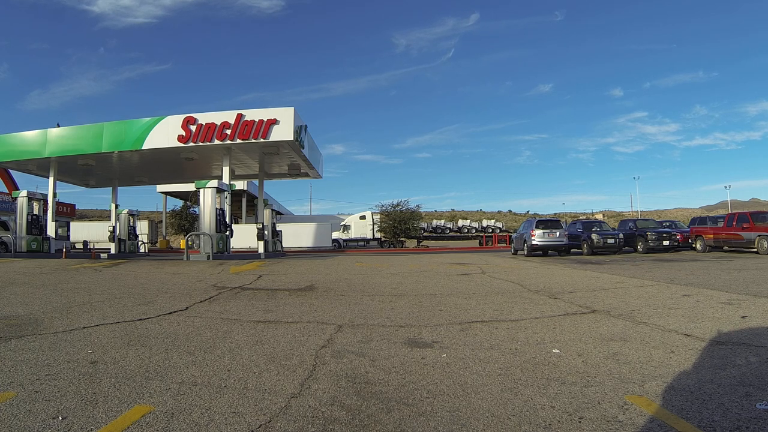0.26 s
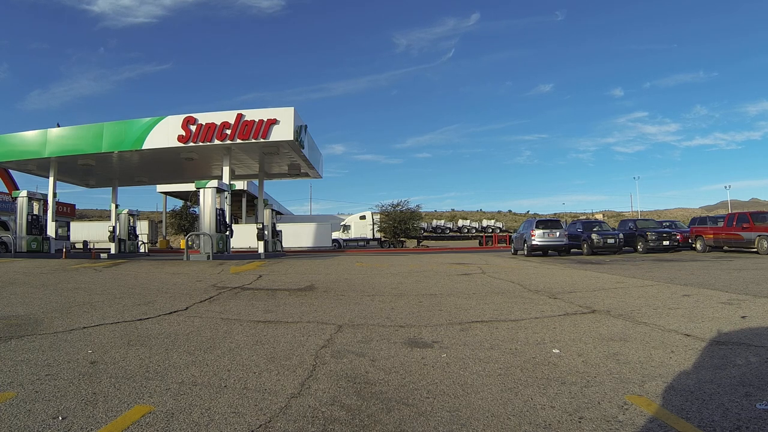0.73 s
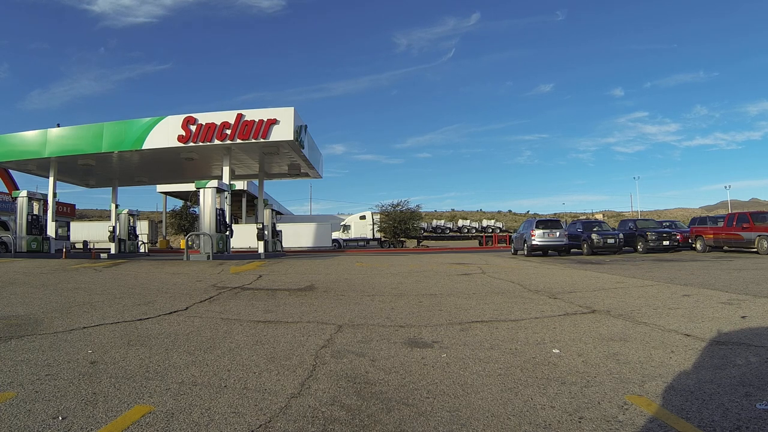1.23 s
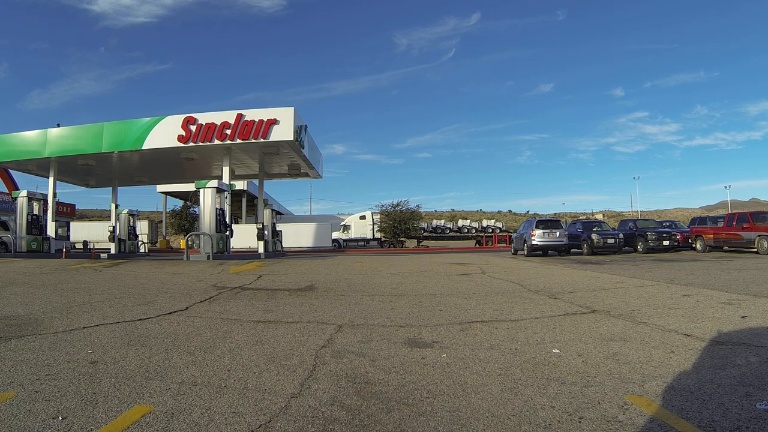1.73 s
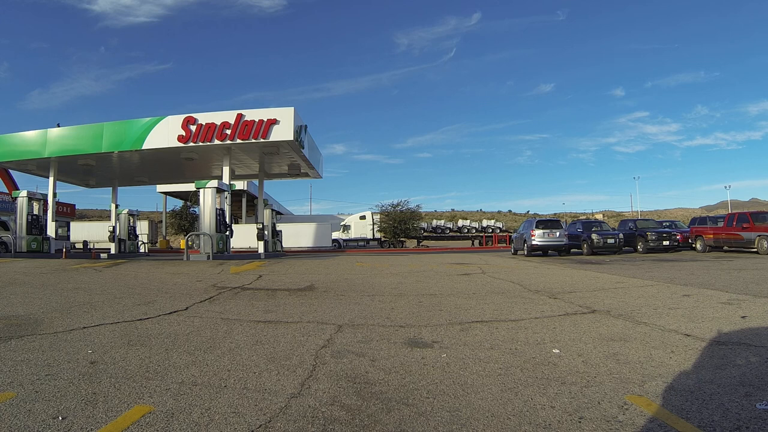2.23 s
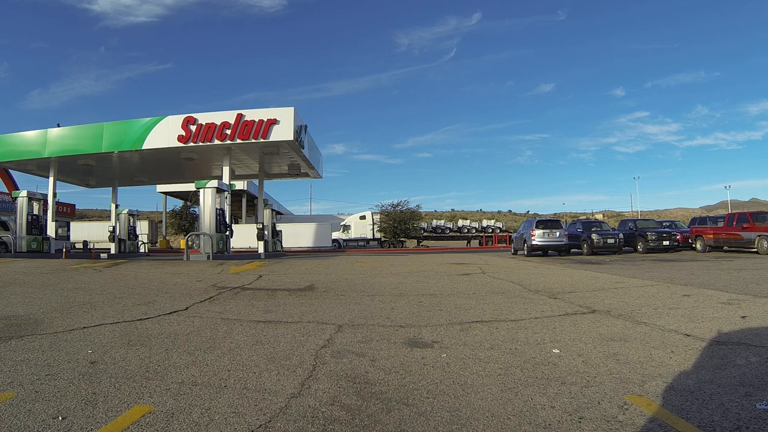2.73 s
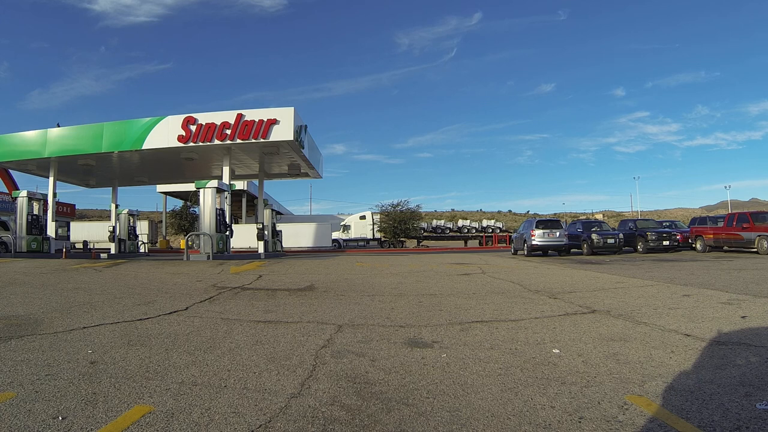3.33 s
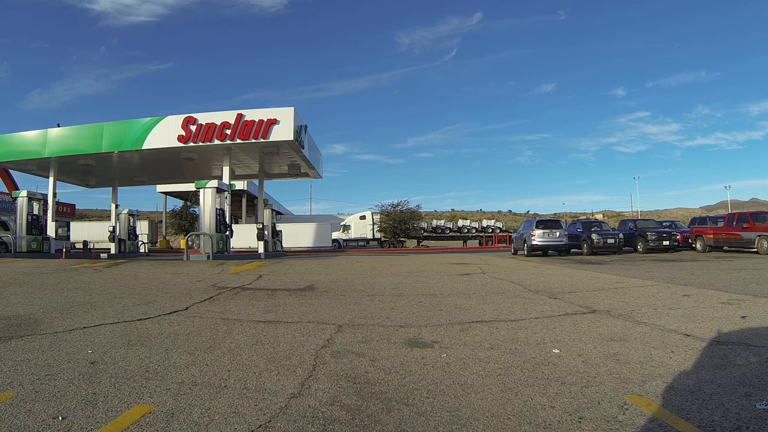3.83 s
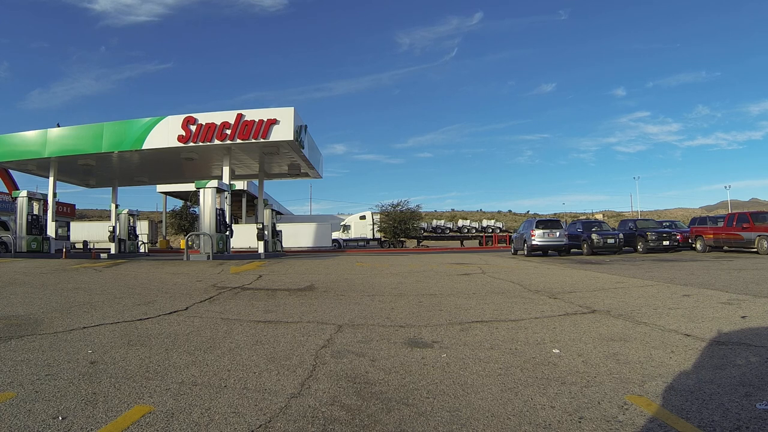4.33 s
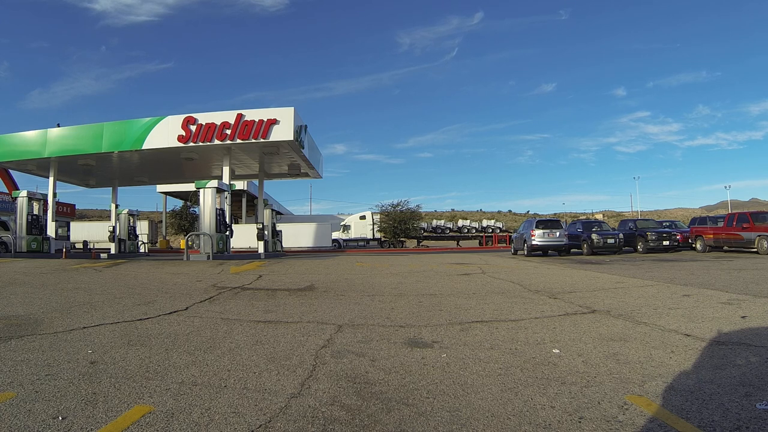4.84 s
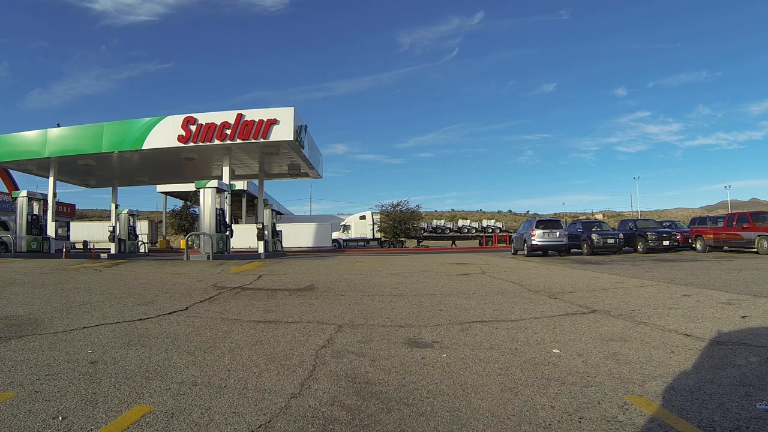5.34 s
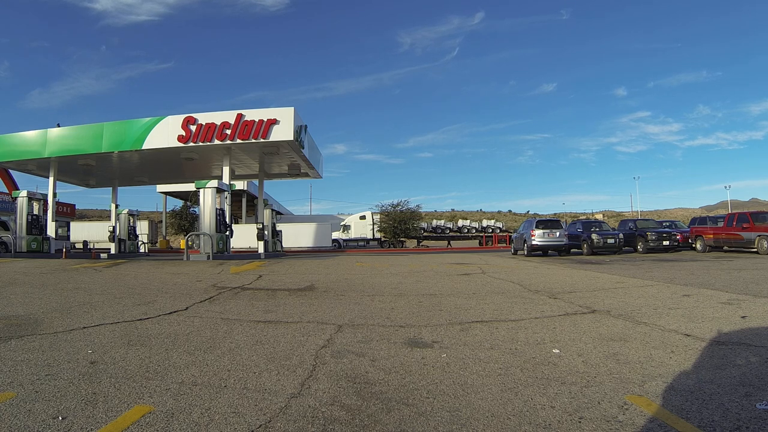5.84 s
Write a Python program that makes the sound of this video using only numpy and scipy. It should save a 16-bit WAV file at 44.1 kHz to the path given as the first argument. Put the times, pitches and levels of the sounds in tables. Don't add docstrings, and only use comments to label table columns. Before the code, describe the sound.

Parked diesels rumble far across an open lot, wavering and beating over blurred traffic. A starter pinion knocks, scrapes and squeals briefly, then the engine fires unevenly, runs up and clatters steadily with gear hum and airy fan noise. It pulls away at a distance. Near the end a brake valve thumps open, releasing compressed air in a sharp rush, then a long, whistling, fading hiss. Small camera microphone, outdoors.

```python
import sys
import numpy as np
from scipy import signal
from scipy.fft import rfft, irfft, next_fast_len
from scipy.io import wavfile
from scipy.ndimage import uniform_filter1d, map_coordinates

SR = 44100
rng = np.random.default_rng(int(sys.argv[2]) if len(sys.argv) > 2 else 0)


def wav_record(signal):
    frames = np.transpose(np.atleast_2d(signal))
    bounded = np.clip(frames, -1, 1)
    quanta = np.round(bounded * 32767).astype(np.int16)
    wavfile.write(sys.argv[1], SR, quanta)


def gain_from_db(level_db):
    decades = np.asarray(level_db, float) / 20
    return 10 ** decades


N = 267880
T = np.arange(N) / SR
CRANK = slice(SR, 2 * SR)


def noise(n=N):
    return rng.standard_normal(n)


def evened(x):
    return x / np.sqrt(np.mean(x ** 2) + 1e-20)


def curves(rows):
    s, *columns = np.transpose(rows)
    gate = np.clip(np.minimum(T - s[0], s[-1] - T) / .02, 0, 1)
    return gate, *(np.interp(T, s, c) for c in columns)


def coloured(x, points):
    size = next_fast_len(N)
    f, db = np.transpose(points)
    hz = np.fft.rfftfreq(size, 1 / SR)
    gain = gain_from_db(np.interp(np.log(hz + 1), np.log(f + 1), db, -120, -120))
    return evened(irfft(rfft(x, size) * gain, size)[:N])


def band(x, lo_hz, hi_hz):
    return signal.sosfilt(signal.butter(4, [lo_hz, hi_hz], "band", fs=SR, output="sos"), x)


def drift(top_hz):
    f, phase = top_hz * np.geomspace(.08, 1, 16), rng.random(16)
    t = T[::64]
    waves = np.sin(2 * np.pi * (f * t[:, None] + phase)) / np.sqrt(f)
    return np.interp(T, t, evened(waves.sum(1)))


def resonate(x, hz, width):
    turn = np.exp(2j * np.pi * np.cumsum(hz * np.ones(len(x))) / SR)
    r = np.exp(-np.pi * width / SR)
    return 2 * (turn * signal.lfilter([1 - r], [1, -r], x / turn)).real


def peak(x, hz, width):
    return signal.lfilter(*signal.iirpeak(hz, hz / width, SR), x)


def tone(hz, db):
    turns = np.cumsum(hz * np.ones(N)) / SR + rng.random()
    return np.sqrt(2) * gain_from_db(db) * np.sin(2 * np.pi * turns)


def ring(t, s, hz, db, t60, rise):
    age = np.clip(t - s, 0, 1)
    return gain_from_db(db - 60 * age / t60) * (1 - np.exp(-age / rise)) * np.sin(2 * np.pi * hz * age)


def sing(t, middle, length, hz, db, glide, rough=1):
    along = np.clip((t - middle) / length, -.5, .5)
    wobble = evened(uniform_filter1d(noise(len(t)), size=260))
    stutter = evened(uniform_filter1d(noise(len(t)), size=120))
    turns = np.cumsum(hz + glide * along + 32 * rough * wobble) / SR
    swell = (1 + .55 * rough * stutter) * np.cos(np.pi * along)
    return np.sqrt(2) * gain_from_db(db) * swell * np.sin(2 * np.pi * turns)


# frequency in Hz, density in dB per Hz.
LOT_ROAR = [(11, -37), (19, -13), (44, -9), (101, -9), (185, -14.5), (283, -17.5), (383, -24), (595, -22),
            (789, -23.5), (1050, -25.5), (1690, -30.5), (2200, -38.5), (2860, -70), (4840, -120)]
# frequency in Hz, density in dB per Hz.
AIRY_TOP = [(1290, -21), (2200, 5), (3010, 0.5), (3290, 3.5), (3800, -1.5), (4530, -1.5), (5410, -6.5),
            (5810, -5), (6000, -4), (8080, -13), (9410, -12), (10400, -17.5), (11000, -19.5), (13300, -20),
            (15000, -26), (15400, -28)]
# frequency in Hz, level in dB rms.
CAMERA_WHINES = [(5645, -81), (11300, -88), (12273, -90.5)]


def lot():
    roar = gain_from_db(-37.5 + 0.42 * drift(3.3)) * coloured(noise(), LOT_ROAR)
    airy = gain_from_db(-59 + .5 * drift(3.08)) * coloured(noise(), AIRY_TOP)
    pulse = 2.2 * np.cos(np.pi * 29.97 * (T - .006)) ** 4
    return roar + airy + pulse * sum(tone(hz, db) for hz, db in CAMERA_WHINES)


# firing tone in Hz, level in dB rms, waver in dB.
DRONES = [(26.58, -37, .4), (35., -49, 2.), (59., -53, 2.), (66.66, -51, 1.), (70.5, -48, 2.5),
          (133.3, -49, 1.5), (140.5, -52, 3.), (177., -56, 2.)]
# tone in Hz, neighbour's tone in Hz, time of one swell in s.
TWINS = [(45.0, 44.43, 1.6), (89.98, 88.87, .013), (53.16, 55.09, .46), (110.17, 108.47, .03)]
# level in dB rms, neighbour's level in dB rms, growth in dB per s.
TWIN_LEVELS = [(-34.5, -45.5, 0.2), (-41, -49.5, -1), (-42, -45, 1.3), (-44, -56.5, 0.24)]
# time in seconds, firing tone in Hz, level in dB.
ROLLING_TRUCK = [
    (0, 98.8, -50),
    (.6, 99.3, -36),
    (1.25, 100.3, -49),
    (1.9, 102.6, -37.5),
    (2.75, 101.5, -41.5),
    (3.15, 101.7, -46.5),
    (3.9, 99.74, -34),
    (4.8, 101, -40.5),
    (6.07, 100.9, -59),
]


def parked():
    out = sum(tone(hz * (1 + 0.00051 * drift(3.16)), db + waver * drift(4)) for hz, db, waver in DRONES)
    for (hz, other_hz, swell), (db, other_db, growth) in zip(TWINS, TWIN_LEVELS):
        common = 2 * np.pi * rng.random() + 0.13 * drift(2.366)
        one = gain_from_db(db) * np.sin(2 * np.pi * hz * (T - swell) + common)
        other = gain_from_db(other_db) * np.sin(2 * np.pi * other_hz * (T - swell) + common)
        out += np.sqrt(2) * gain_from_db(growth * (T - T[-1] / 2) + 0.4 * drift(5.5)) * (one + other)
    _, hz, db = curves(ROLLING_TRUCK)
    return out + tone(hz * (1 + 0.0053 * drift(3.09)), db + 1.64 * drift(2.536))


# start in seconds, peak in dB, ring t60 in s, brightness in dB.
BLOWS = [
    (1.076, -22, 0.048, 6.5),
    (1.1064, -32, 0.12, 6),
    (1.4391, -33, 0.12, 2),
    (1.4574, -37, 0.12, 0),
    (1.4774, -44, 0.12, -3),
    (1.5638, -29, 0.11, -11),
    (1.5844, -44, 0.12, -8),
    (1.7848, -49, 0.12, -11),
]
# start in seconds, length in s, level at start in dB, level at end in dB.
GRIND = [
    (1.082, 0.058, -52, -51.5),
    (1.14, 0.118, -51.5, -51.5),
    (1.26, 0.1, -50.5, -48),
    (1.368, .07, -50, -55.5),
    (1.437, 0.15, -46, -56.5),
    (1.563, 0.051, -43, -56),
    (1.614, 0.18, -50, -48),
    (1.797, 0.076, -57, -61),
]
# frequency in Hz, width in Hz, level in dB.
HOUSING = [(1190, 20, 4), (1443, 23, -2), (2310, 80, -0.5), (2770, 97, -0.5), (3270, 92, -1),
           (3400, 56, -5), (4110, 33, -14), (4470, 40, -15), (5900, 52, -10), (6000, 93, -12),
           (6360, 36, -8), (7300, 88, -15), (7700, 70, -11), (8000, 92, -10), (9800, 72, -37),
           (10200, 42, -29), (10500, 120, -21)]
# frequency in Hz, density in dB per Hz.
RASP = [(710, -30), (1200, -8), (1470, -5), (1940, -8.5), (2360, -10), (3780, -11), (4880, -17.5),
        (5760, -10), (10600, -28.5), (12500, -40), (16200, -74), (22000, -120)]


def grinding_teeth(t):
    dull = 0
    for s, length, from_db, to_db in GRIND:
        stroke = (t >= s) * (t < s + length)
        dull = dull + gain_from_db(3.0 + from_db + (to_db - from_db) * (t - s) / length) * stroke
    dull = uniform_filter1d(dull, size=400)
    bright = dull
    for s, db, t60, bright_db in BLOWS:
        age = np.maximum(t - s, 0)
        hit = gain_from_db(db - 19.5 - 60 * age / t60) * (1 - np.exp(-age / 0.00098))
        dull, bright = dull + hit, bright + hit * gain_from_db(bright_db)
    out = gain_from_db(-4.5) * bright * coloured(noise(), RASP)[CRANK]
    for hz, width, db in HOUSING:
        caught = np.repeat(noise(50), SR // 50)
        teeth = gain_from_db(2.9 * caught) * noise(SR) * (dull if hz < 2000 else bright)
        out += gain_from_db(db - 14.0) * np.sqrt(SR / width) / 2 * peak(teeth, hz, width)
    return out


# frequency in Hz, level in dB, t60 in s.
PINION = [(2370, -47, 0.15), (2760, -44, 0.1), (3270, -43, 0.069), (3700, -44, 0.093), (3790, -50, .1)]
FLYWHEEL = [(620, -52, 0.11), (903, -43, 0.13), (1190, -49, 0.089), (1463, -32.5, 0.08), (1745, -43, 0.087)]
CASING = [(4320, -47, 0.2), (4613, -50, .12), (5620, -48.5, 0.25), (6000, -46, 0.074), (6650, -60, .1)]
# start in seconds, level in dB, share of the pitch.
PINION_HITS = [(1.075, 3, 1.005), (1.106, -4, .995), (1.436, -3, 1.003), (1.458, -3, .997),
               (1.563, -4, .997), (1.58, -5, 1.002), (1.785, -6, 1.001)]
FLYWHEEL_HITS = [(1.076, -6, 1.005), (1.104, -4, 1.02), (1.439, 3, .99), (1.457, 0, .96), (1.473, -5, .96),
                 (1.562, -3.5, 1.03), (1.579, -2.5, 1.005)]
CASING_HITS = [(1.104, -9, 1.02), (1.44, -1.5, .998), (1.47, -1, 1.003), (1.564, -4, 1.002),
               (1.585, -5, 1.003)]


def struck_parts(t):
    out = 0
    for modes, hits in [(PINION, PINION_HITS), (FLYWHEEL, FLYWHEEL_HITS), (CASING, CASING_HITS)]:
        for hz, db, t60 in modes:
            chatter = evened(uniform_filter1d(noise(SR), size=180))
            rings = sum(ring(t, s, hz * pitch, db + hit_db, t60, 0.0025) for s, hit_db, pitch in hits)
            out = out + rings * (.9 + .25 * chatter)
    return out


# middle in seconds, length in s, tone in Hz, level in dB, glide in Hz.
SINGING = [(1.2, 0.045, 3270, -54, 57), (1.201, .05, 4360, -54, 150), (1.217, 0.038, 2350, -58, 1),
           (1.221, 0.059, 3700, -56, 222), (1.253, .06, 3280, -59, -5), (1.252, 0.05, 3920, -59, -1),
           (1.255, .04, 5140, -61, 81), (1.278, .08, 5380, -58, -0.5), (1.288, .045, 4000, -52, 100),
           (1.29, 0.053, 2700, -57, -54), (1.305, 0.054, 3240, -54, 4), (1.31, 0.045, 3770, -54, -59),
           (1.319, .05, 5000, -62, -150), (1.325, .05, 6030, -62, 3), (1.333, 0.046, 1190, -44.5, -110),
           (1.336, 0.044, 3630, -54, -160), (1.338, 0.051, 4670, -60, -62), (1.34, 0.032, 5620, -56, -3),
           (1.362, 0.027, 3330, -51.5, -1.5), (1.369, .05, 4400, -56, 61), (1.72, .16, 3270, -61, 1),
           (1.73, .1, 6450, -59, -1), (1.113, 0.033, 630, -45, -30), (1.123, .025, 920, -48, 2),
           (1.108, .025, 6100, -57, 0), (1.11, 0.023, 3820, -54, 0), (1.455, 0.021, 945, -41, -1),
           (1.479, 0.017, 1180, -48, -0.5), (1.35, .04, 2250, -55, 1), (1.31, .04, 6500, -62, 0)]
# start in seconds, length in s, from Hz, to Hz, width in Hz, level in dB.
SLIPS = [
    (1.18, .07, 3250, 3900, 150, -56),
    (1.25, .14, 5700, 4350, 250, -57),
    (1.16, .1, 5700, 5300, 400, -62),
    (1.27, .1, 4150, 3400, 250, -57),
    (1.28, .09, 1400, 1150, 150, -52),
]


def slipping_pinion(t):
    arch = np.sin(np.pi * np.clip((t - 1.22) / .16, 0, 1))
    squeal = evened(resonate(noise(SR), 9900 + 550 * arch, 300))
    out = np.clip(4 * arch, 0, 1) * gain_from_db(-69) * squeal
    out += sum(sing(t, *row, rough=.8) for row in SINGING)
    for s, length, from_hz, to_hz, width, db in SLIPS:
        along = np.clip((t - s) / length, 0, 1)
        scrape = resonate(noise(SR), from_hz + (to_hz - from_hz) * along, width)
        out += gain_from_db(db) * np.sqrt(4 * along * (1 - along)) * evened(scrape)
    return out


def starter():
    t = T[CRANK]
    out = grinding_teeth(t) + struck_parts(t) + slipping_pinion(t)
    return np.pad(band(out, 460, 12000), (SR, N - 2 * SR))


# frequency in Hz, density in dB per Hz.
BLOCK = [(140, -51), (230, -5.5), (293, -1), (319, -4.5), (397, -8), (427, -6.5), (586, 1), (775, -7),
         (886, -1), (1170, -4.5), (1260, -7), (1410, -3.5), (1530, -7.5), (3500, -19.5), (4200, -67),
         (5460, -65), (9240, -120)]
# frequency in Hz, width in Hz, level in dB, change in dB per s of turning.
PANELS = [(580, 98, -16.5, 5), (653, 41, -21, 2), (857, 73, -26.5, 11.5), (1000, 30, -31, 4),
          (1105, 100, -25.5, 3), (1190, 5, -31, -6), (1350, 24, -19, 2), (1642, 30, -24, -1),
          (1883, 330, -17, -2), (3230, 230, -28, -8.5)]


def block_and_panels(knock):
    turned = np.clip(T - 4.0, -1.5, 1.5)
    block = coloured(knock, BLOCK)
    clatter = band(block, 1677, 3470)
    body = gain_from_db(-2.0) * (block - clatter) + gain_from_db(-8.5 + 0.5 * turned) * evened(clatter)
    rung = 0
    for hz, width, db, change in PANELS:
        rung = rung + gain_from_db(db + change * turned + 0.65 * drift(3.3)) * evened(peak(knock, hz, width))
    return body + band(rung, 490, 3330)


# multiple of the cycle, level in dB above the body.
CLEAN_ORDERS = [(12, -13.5), (15, -13), (16, -15.5), (17, -10), (18, -11.5), (24, -15)]
# multiple of the cycle, level in dB above the body, clearest time in seconds, fade in dB per s.
GEAR_ORDERS = [(36, -14, 3.3, 1), (42, -11, 4.1, 11), (43, -17, 2.7, 2), (44, -17, 4.1, 2),
               (45, -16, 2.7, 6), (46, -19, 4.9, 7), (48, -10, 3.1, 3), (50, -13, 2.9, 2),
               (51, -15, 4.9, 5), (53, -14, 3.5, 6), (54, -14, 3.5, 6), (56, -17, 4.7, 7),
               (57, -16, 2.5, 6), (58, -14, 4.5, 4), (59, -14, 3.1, 6), (62, -20, 3.5, 4),
               (68, -19, 5.3, 4), (69, -16, 4.1, 9), (70, -18, 3.9, 2), (72, -14, 2.7, 4),
               (75, -16, 3.1, 4), (76, -19, 3.5, 4), (78, -17, 3.5, 4), (81, -14, 2.7, 5),
               (82, -18, 2.9, 4), (84, -18, 2.5, 3), (85, -19, 4.3, 7), (87, -14, 3.3, 4),
               (89, -19, 4.3, 6), (92, -16, 4., 9), (99, -12, 3.1, 9), (100, -19, 2.7, 5),
               (104, -23, 4.2, 6), (111, -15, 5.2, 10), (112, -18, 4.4, 8), (113, -19, 4.6, 4),
               (115, -19, 2.7, 4), (118, -19, 2.9, 6), (119, -20, 3.5, 8)]


def orders(firing_hz, fires):
    out = sum(tone(firing_hz * k / 6, db - 3.5 + 2.2 * drift(2.593)) for k, db in CLEAN_ORDERS)
    t, cycles = T[::4], fires[::4] / 6
    gears = np.zeros(len(t))
    for k, db, clear, fade_db in GEAR_ORDERS:
        level = gain_from_db(db - fade_db * abs(t - clear) + 1.1 * drift(2.38)[::4])
        gears += level * np.sin(2 * np.pi * (k * cycles + (k / 12) ** 2 + .2 * rng.random()))
    return out + np.sqrt(2) * signal.resample_poly(gears, 4, 1)[:N]


# time in seconds, firings per second.
SPEED = [(1.6, 71.7), (2.3, 72.3), (2.7, 72.1), (3.1, 72.45), (3.6, 72.7), (3.9, 72.4), (4.3, 73.0),
         (4.6, 72.8), (4.9, 73.2), (5.2, 72.6), (5.5, 73.2), (6.07, 72.8)]
# time in seconds, body level in dB.
ENGINE = [
    (1.62, -50.5),
    (1.97, -40.5),
    (2.6, -36.5),
    (3.1, -36),
    (4.6, -37),
    (5.4, -37.5),
    (6.07, -45.5),
]
CYLINDER_DB = [3.5, -5, 0.5, 3, 1, -25]


def engine():
    firing_hz, body_db = curves(SPEED)[1], curves(ENGINE)[1]
    fires = np.cumsum(firing_hz) / SR
    blow = gain_from_db(np.array(CYLINDER_DB)[fires.astype(int) % 6]) * np.exp(-(fires % 1) / .6)
    cycle = noise(3640)
    repeat = np.interp(fires / 6 % 1 * len(cycle), np.arange(len(cycle)), cycle)
    share = .55
    rattle = share * evened(repeat) + np.sqrt(1 - share ** 2) * noise()
    knock = (3.0 + blow) * rattle
    body = gain_from_db(body_db) * (block_and_panels(knock) + orders(firing_hz, fires))
    return np.clip((T - ENGINE[0][0]) / 0.043, 0, 1) * body + fan(blow)


# time in seconds, level in dB, extra path of the bounce in ms.
HISS = [
    (1.83, -65, 0.23),
    (2.0, -62, 0.23),
    (2.8, -64.5, 0.24),
    (3.4, -68, .285),
    (4.2, -62.5, 0.316),
    (5.5, -67.5, 0.36),
    (6.07, -69.5, 0.38),
]
# low edge in Hz, high edge in Hz.
OPENINGS = [(4200, 5490), (5600, 7400), (7900, 10330)]
# level in dB, then its change in dB per s as the grille swings away.
OPENINGS_DB = [-1, 1.5, -9]
OPENINGS_TURN = [0.6, 0, -1.5]


def fan(blow):
    _, db, extra_ms = curves(HISS)
    air = (2.4 + blow) * noise()
    hiss = 0
    for level_db, turn_db, edges in zip(OPENINGS_DB, OPENINGS_TURN, OPENINGS):
        hiss = hiss + gain_from_db(level_db + turn_db * (T - T[-1] / 2)) * evened(band(air, *edges))
    bounce = map_coordinates(hiss, [np.arange(N) - extra_ms * SR / 1000], order=3)
    start = np.clip((T - HISS[0][0]) / 0.066 + 1, 0, 1)
    return start * gain_from_db(db) * (hiss + 0.5 * bounce)


VALVE_S, VALVE_RISE_S = 4.656, .019
# frequency in Hz, level in dB, t60 in s.
CHAMBER = [(266, -23, .2), (325, -32, .1), (106, -25, .15), (145, -31, .3)]
# middle in seconds, length in s, tone in Hz, level in dB, glide in Hz.
HOSE_KICK = (4.694, .045, 595, -37, -50)


def brake_pop(rise, age):
    pop = sum(ring(T, VALVE_S + 0.007, *mode, 0.006) for mode in CHAMBER)
    pop = pop + sing(T, *HOSE_KICK, rough=0.35)
    return pop + rise * gain_from_db(-45 - 60 * age / 0.3) * evened(band(noise(), 370, 3000))


# frequency in Hz, density in dB per Hz.
JET = [(1060, -33), (1800, -15), (2730, -9), (3660, -8.5), (4030, -15), (4950, 0), (5310, 3), (6180, 8.5),
       (8500, -8.5), (9970, -14.5), (11500, -25), (13400, -31), (15000, -41)]
# frequency in Hz, width in Hz, level in dB.
WHISTLE = [(6300, 30, -10), (5570, 78, -17), (6370, 56, -16), (5980, 410, -21), (10100, 300, -20),
           (4920, 54, -20), (7940, 70, -22)]


def brake_jet(rise, age):
    rush = gain_from_db(-36 - 60 * age / .19)
    tank = gain_from_db(-41 - 18.5 * age)
    settled = np.clip((T - VALVE_S) / 0.16, 0, 1)
    air = coloured(noise(), JET)
    core = evened(band(air, 4130, 6300))
    upper = gain_from_db(-3.5 - 3.3 * settled) * evened(band(air, 6640, 7900))
    jet = gain_from_db(-1.5) * (core + upper)
    jet += gain_from_db(-7 - 11 * age) * evened(band(air, 8100, 14000))
    jet += gain_from_db(-8.5 - 2 * age) * evened(band(air, 1700, 4340))
    jet += settled * sum(gain_from_db(db + 1.2 * drift(7.1)) * evened(peak(air, hz, width)) for hz, width, db in WHISTLE)
    return rise ** 2 * (rush + tank) * gain_from_db(0.58 * drift(60)) * jet


# middle in seconds, length in s, tone in Hz, level in dB, glide in Hz.
OUTLET_TONE = [
    (4.898, 0.41, 6040, -52.5, -10.5),
    (5.089, 0.34, 6000, -57, 87.5),
    (5.36, .2, 5530, -63, 58),
]


def brake():
    rise = np.clip((T - VALVE_S) / VALVE_RISE_S, 0, 1)
    age = np.maximum(T - VALVE_S - VALVE_RISE_S, 0)
    whistle = sum(sing(T, *row, rough=0.29) for row in OUTLET_TONE)
    return brake_pop(rise, age) + brake_jet(rise, age) + whistle


def scene():
    return (lot() + parked() + starter() + engine() + brake())[None]


def band_limit(x):
    return signal.sosfilt(signal.butter(12, 15280, fs=SR, output="sos"), x)


def record(dry):
    return band_limit(dry)


dry = scene()
out = record(dry)
wav_record(out)
```